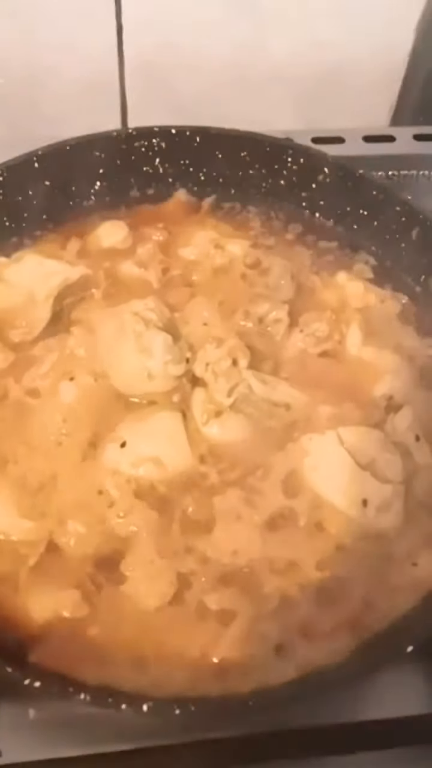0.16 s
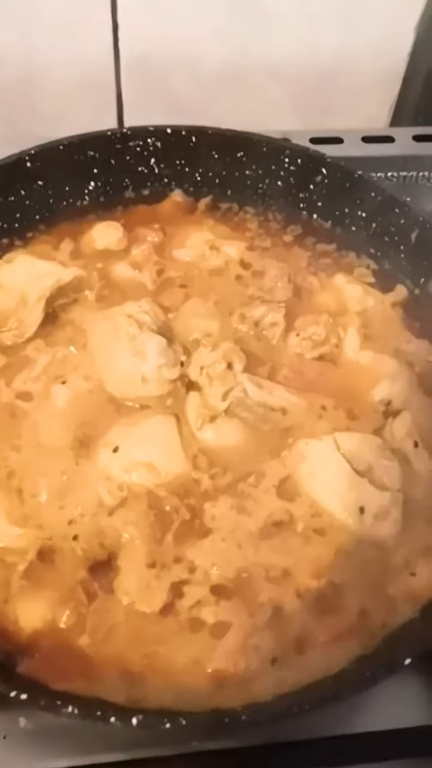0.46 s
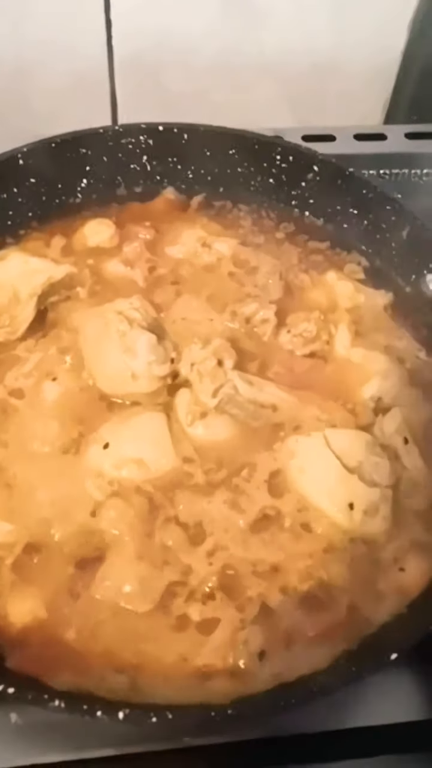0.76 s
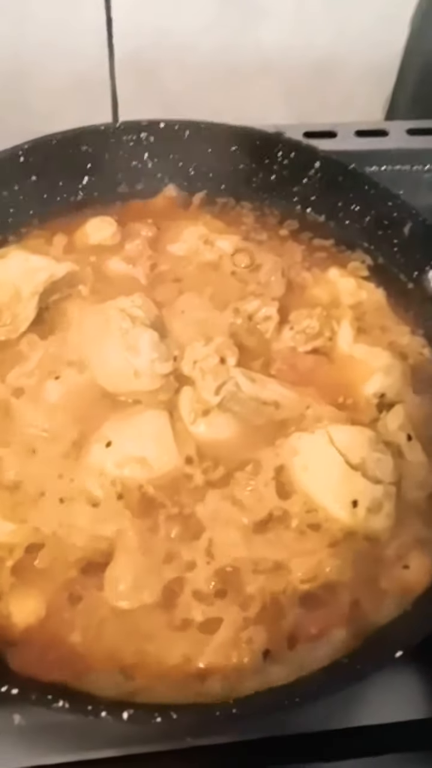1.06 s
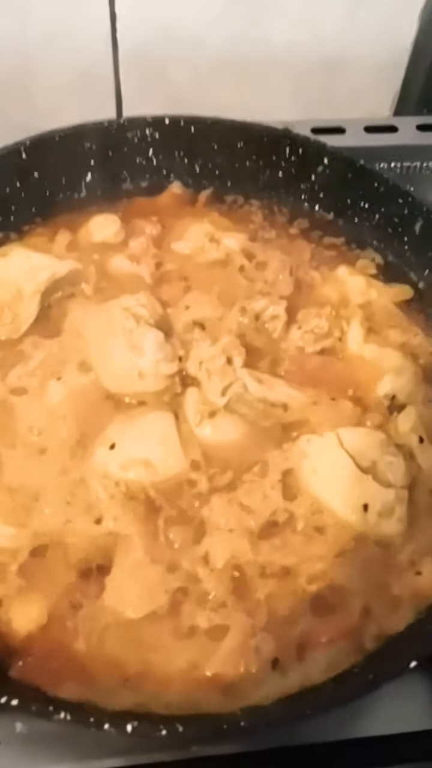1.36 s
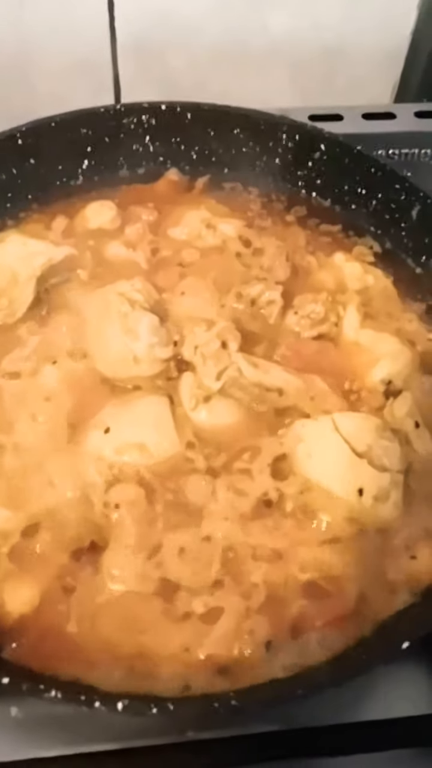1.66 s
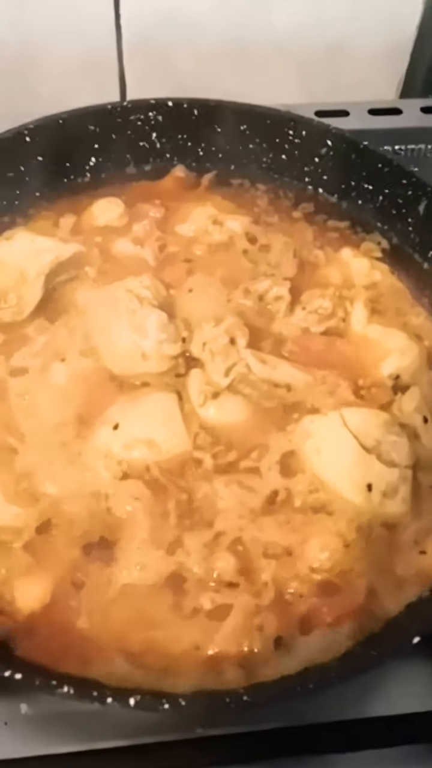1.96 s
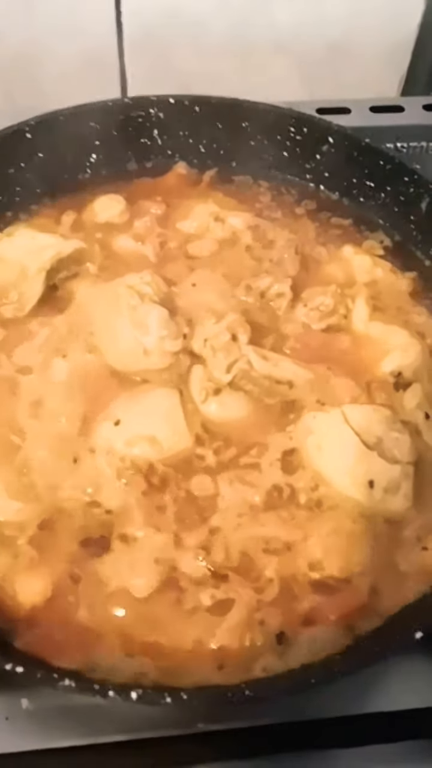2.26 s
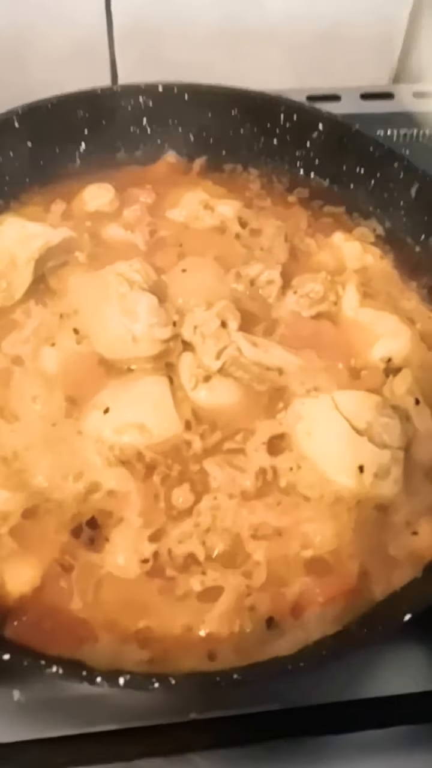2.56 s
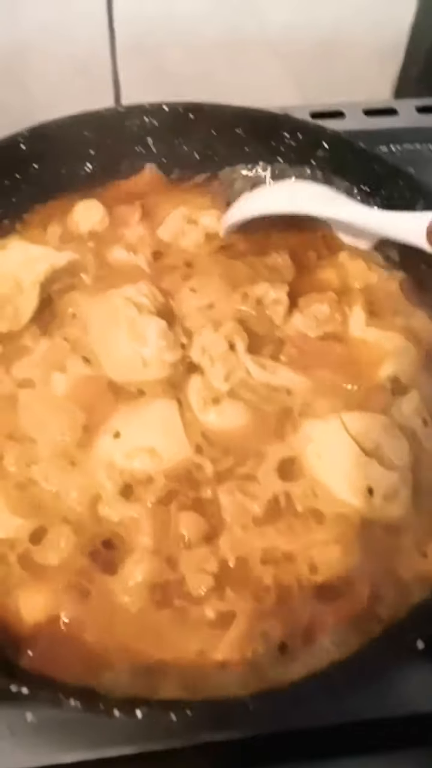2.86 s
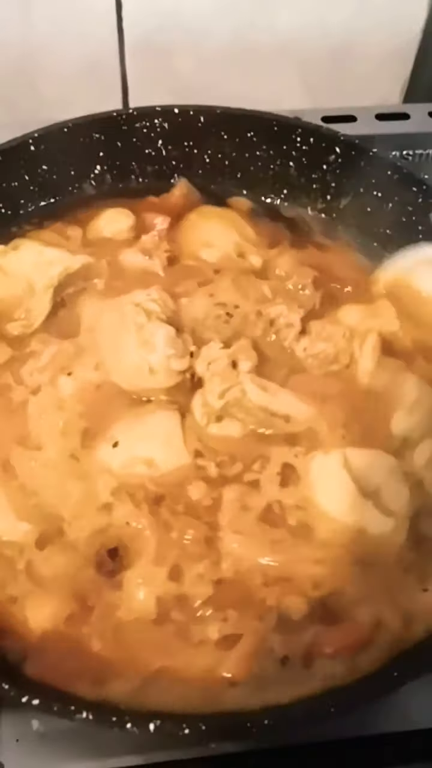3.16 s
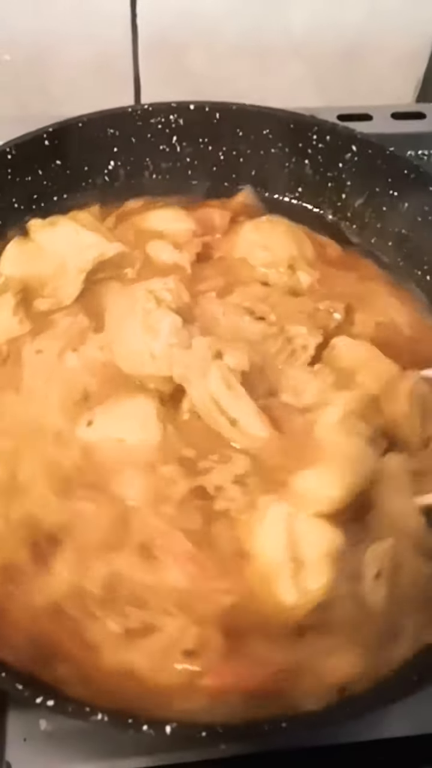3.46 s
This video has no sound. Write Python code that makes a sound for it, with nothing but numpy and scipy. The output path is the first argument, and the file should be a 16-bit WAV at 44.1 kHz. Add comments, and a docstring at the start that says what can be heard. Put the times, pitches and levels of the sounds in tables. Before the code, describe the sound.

Pan lid clattering and sliding loudly beside the stove, then quiet bubbling with light spoon knocks.

```python
"""A thick curry simmers throughout in a tiled kitchen: coloured-noise fizz and floor, with crackle and bubble
grains. From the start a pan lid slides to the right of the stove: random slips drive rumble, rasp, ring and a
cabinet boom. It clanks, bumps and rattles to rest: noise bursts with decaying modes of lid, rack and worktop.
Then a few low plops (short tone pulses) and a spoon: it is picked up, then swishing noise and light knocks on
the pan (noise bursts)."""
import sys
import numpy as np
from scipy import signal
from scipy.fft import rfft, irfft, next_fast_len
from scipy.io import wavfile
from scipy.ndimage import uniform_filter1d, map_coordinates

SR = 44100
rng = np.random.default_rng(int(sys.argv[2]) if len(sys.argv) > 2 else 0)


def dump(signal):
    """Clip the signal to [-1, 1] and save it as 16-bit WAV at the path in sys.argv[1]."""
    limited = np.clip(np.atleast_2d(signal).T, -1, 1)
    pcm = np.round(limited * 32767).astype(np.int16)
    wavfile.write(sys.argv[1], SR, pcm)


N = 158760
T = np.arange(SR * 3 // 4) / SR  # time axis of one hit, s
BLOW_S = 0.02

# Simmer: noise colour of the fizz: hz, gain_db
FIZZ = [(300, -21.5), (2000, 3.5), (3500, 1.5), (5500, -3.5), (7500, -6), (9200, -4), (11000, -17.5),
        (13000, -16), (16000, -18.5)]
# Jets of steam through the sauce: centre_s, level_db (before layer trims), e_fold_s
SPURTS = [(1.702, -72.5, 0.016), (1.876, -65, 0.014), (2.035, -71, 0.0348), (2.24, -70.5, 0.036),
          (2.66, -67, 0.015), (3.069, -65.5, 0.033)]
# Low simmer and stove, noise colour: hz, gain_db
FLOOR = [(15, -53.5), (25, -5), (118, -2), (175, -5.5), (299, -11.5), (425, -20.5), (567, -12.5),
         (1150, -20.5), (1470, -24), (2000, -24.5), (3500, -39), (6000, -110)]
SIZZLE_DB, FIZZ_DB, CRACKLE_DB = -74.5, 6, 5.5  # sizzle: base level; fizz, crackle: trims on it
BUBBLE_DB, FLOOR_DB = -70.5, -61.5

# Sliding lid, levels before the slide trim: time_s, rumble_db, rasp_db, treble_db
SLIDE = [(0, -36.5, -25, -35), (0.121, -44.5, -42.5, -52), (0.281, -38, -37.5, -48),
         (.45, -34.5, -40.5, -52), (0.519, -23.5, -30.5, -45.5), (.61, -28.5, -43.5, -46.5),
         (.72, -35.5, -41, -52), (0.813, -34, -30.5, -47.5), (0.872, -25, -28.5, -50), (.95, -27, -39, -34),
         (1.032, -22, -23, -29), (1.09, -32, -31, -34.5), (1.188, -36.5, -38.5, -41.5),
         (1.251, -46.5, -42, -52), (1.36, -67, -66, -65), (1.49, -52.5, -60, -55), (1.561, -70, -69.5, -92)]
# Rim squeaks and chirps: start_s, pitch_hz, rms_db (before the room), length_s
SQUEAKS = [(0.358, 6690, -41, 0.008), (0.483, 3486, -36, .012), (0.485, 6490, -48.5, .015),
           (0.544, 6660, -51, .01), (0.637, 6730, -38, .012), (0.922, 3464, -20, 0.01),
           (1.003, 6580, -33, .04), (1.056, 6350, -28, .014)]
SQUEAK_WOBBLE_PER_S = 740  # knots of random phase
SLIPS_PER_S, SLIP_SPREAD_DB, CATCHES_PER_S, CATCH_DB = 260, 4, 130, 3.5
# Cabinet under the sliding lid, noise colour: hz, gain_db
BOOM = [(24, -28.5), (38, -8), (55, -7), (80, 5), (110, -9), (200, -23), (600, -74)]
BOOM_DB, BOOM_FOLLOW = -44.5, 0.25  # level at average rumble; share of the rumble's dB swing

# Lid contacts, levels before trims: start_s, thud_db, clack_db, tick_db, lid_ring_db, rack_ring_db, contact_t60_s
CONTACTS = [(0.003, -45, -29.5, -50.5, -29, -52, 0.0075), (0.1447, -31.5, -18.5, -25.5, -8.5, -33, 0.044),
            (0.305, -30, -38.5, -61, -34, -50, 0.092), (0.361, -42.5, -36, -46, -56, -61.5, 0.0054),
            (0.403, -28.5, -49, -62, -58, -63, 0.014), (0.428, -49, -34, -45, -39, -43.5, 0.036),
            (0.567, -17, -30, -50, -43, -19, 0.021), (0.587, -27.5, -24, -43, -34, -27.5, 0.061),
            (0.6396, -23, -17.5, -28.5, -27, -8.5, 0.039), (0.691, -27, -29.5, -58.5, -44, -31.5, 0.0054),
            (0.7604, -32, -24, -30, -39, -39, 0.0044), (0.7915, -40, -25.5, -48, -51, -42, 0.0034),
            (0.8555, -23, -40.5, -58, -45.5, -37, 0.02), (0.9229, -25, -17, -22, -36, -25, 0.02),
            (0.9671, -20.5, -19, -33.5, -31, -17.5, 0.0095), (0.9943, -18, -17, -27, -28, -14, 0.011),
            (1.004, -37, -19.5, -29, -39, -24.5, 0.016), (1.0194, -29, -13, -24, -27.5, -21.5, 0.053),
            (1.041, -30, -18, -29, -29.5, -26.5, 0.011), (1.087, -30, -21.5, -34, -54, -34, 0.0045),
            (1.109, -25.5, -13.5, -29.5, -36, -29, 0.0035), (1.128, -27.5, -32.5, -24, -38, -22, 0.033),
            (1.1744, -25.5, -20, -63, -50, -42.5, 0.0072), (1.398, -30.5, -48, -45.5, -63, -62.5, 0.064),
            (1.413, -34.5, -33, -63, -63, -54, 0.0074), (1.448, -57.5, -35, -51, -62, -52, 0.0031)]
# Lid modes: pitch_hz, level_db (before scatter), t60_s (before the grip)
LID = [(1227, -5, 0.22), (1610, -12, .25), (1917, 1.5, 0.44), (2100, 2, 0.19), (2116, -17.5, .15),
       (2337, 4.5, 0.3), (2372, -6.5, 0.16), (2413, -2, 0.3), (2600, -9, 0.11), (2792, -13, 0.25),
       (2905, -6.5, 0.17), (3560, -16.5, .45)]
# Modes of the metal it lands on: pitch_hz, level_db (before scatter), t60_s
RACK = [(1196, -14, 0.08), (1697, -5.5, 0.35), (1810, -7, .12), (1921, 4, 0.26), (1927, -4, 0.2),
        (2214, -8.5, .15), (2500, -4.5, 0.25), (2735, -2, 0.22), (3280, -17.5, 0.21)]
# Worktop modes: pitch_hz, level_db (before scatter), t60_s
WORKTOP = [(135, -11, 0.31), (171.7, 4.5, 0.2), (223.7, -6, 0.077), (257.9, 2.5, 0.54), (284, -0.5, 0.13),
           (451.4, 1.5, 0.15), (531, -9, 0.35), (572, -3, 0.27)]
# Low part of a contact, noise colour: hz, gain_db
THUD = [(25, -43.5), (60, -31), (110, -24), (165, -8), (260, -1), (480, -2), (700, -6), (1200, -13.5),
        (3000, -97.5)]
# Middle part of a contact, noise colour: hz, gain_db
CLACK = [(60, -39.5), (400, -10), (700, 5), (1250, -2.5), (1750, 5), (2700, 6), (3400, -13.5),
         (5000, -27.5), (9000, -35.5), (16000, -71)]
# Bright part of a contact, noise colour: hz, gain_db
TICK = [(200, -48), (2200, -18), (3400, 10.5), (5000, 2), (6800, -1.5), (9000, -9.5), (11000, -19.5),
        (13000, -43.5), (16000, -54)]
THUD_DB, CLACK_DB, TICK_DB, LID_DB, RACK_DB = -4, -2, -6.5, 1.5, -2  # trims
WORKTOP_DB, THUMP_DB = -7, -6  # relative to the untrimmed thud
THUMP_HZ, THUMP_T60_S, THUMP_WET_DB = 278, 0.03, -6.5
GRIP_S, GRIP_T60_S = 0.13, 0.086  # the hand stops the lid's ring after this long, this fast
CHATTER, CHATTER_PER_S, CHATTER_T60_S = 0.8, 700, 0.16
SNAP_S, SNAP_DB, SNAP_T60_S, SNAP_WET_DB = 0.7612, -28.5, 0.0038, -14  # one very crisp click of the rim
LID_WET_DB, METAL_WET_DB = 5, -3
CLICK_DRY_DB, CLICK_T60_S = 9, 0.005  # less room on brief clicks; e-fold in contact t60

# Bursting bubbles: centre_s, pitch_hz, peak_db (before room and pan), e_fold_s
PLOPS = [(1.872, 181, -27.5, 0.0018), (2.517, 200, -22, 0.0017), (2.687, 847, -48, 0.0031),
         (2.861, 755, -31, 0.0027), (3.011, 239, -34, 0.00216), (3.022, 775, -32, 0.0024)]
# The pan of sauce, gain on each plop: hz, gain_db
PLOP_BODY = [(35, -16), (90, 4), (140, 3), (500, -5)]
PLOP_WET_DB = -16.5

# Spoon drawn along, then through the sauce: time_s, level_db (before wobble)
SWISH = [(2.02, -79), (2.07, -66), (2.27, -62), (2.44, -69.5), (2.52, -91.5), (2.85, -72), (3.0, -66),
         (3.15, -73), (3.3, -69), (3.42, -68), (3.52, -59.5), (3.6, -84.5)]
# Swish noise colour: hz, gain_db
SWISH_COLOUR = [(200, -28), (800, -11), (1600, -0.5), (2700, 0.5), (3500, -20), (8000, -37)]
# Spoon knocks, the first two as it is picked up, the rest on the pan: start_s, thud_db, clack_db, tick_db,
# contact_t60_s
SPOON = [(2.003, -43, -58, -69.5, 0.21), (2.166, -56, -53, -85, 0.0038), (3.262, -67, -71, -59, 0.0055),
         (3.4735, -52, -54.5, -50.5, 0.0015), (3.48, -61, -63, -57, 0.0067),
         (3.5059, -61, -68, -46.5, 0.0025)]
# Thud, clack and tick noise colours of the spoon, each: hz, gain_db
SPOON_COLOURS = ([(40, -16), (150, -1.5), (280, 3), (560, -7), (1000, -14.5), (2500, -83)], [(200, -29),
                 (800, -23), (1400, 9), (2400, 0.5), (3300, -18), (4200, -41.5)], [(300, -19), (1900, -5),
                 (2900, 6.5), (4600, -41), (16000, -52.5)])
SPOON_WET_DB = -2

# Decay of the kitchen's tail: hz, t60_s
ROOM = [(60, 1), (170, 0.6), (300, 0.23), (700, 0.39), (2000, 0.36), (5000, 0.46), (12000, 0.22)]
# Left-right likeness of diffuse sound: hz, correlation
ALIKE = [(60, 0.98), (130, 0.96), (290, 0.79), (640, -0.27), (1400, 0.4), (3000, 0.025)]
EARLY_DB, EARLY_T60_S = 5, 0.049
LID_LAG_S, PAN_LAG_S, PLOP_LAG_S = 0.00061, -0.00008, 0.00057  # left behind right
# Left microphone response: hz, gain_db
LEFT_MIC = [(100, 2), (400, 2.5), (1200, -1.5), (2400, -4.5), (4500, 1.5), (8000, -2), (15000, 3)]
# Right microphone response: hz, gain_db
RIGHT_MIC = [(100, 2.5), (400, 3.5), (1200, 0.5), (2400, -5), (4500, -2), (6800, -12), (8400, -22.5),
             (10500, -17), (15000, 0.5)]
TOP_HZ = 15750


def amp(db):
    """Decibels to gain."""
    return 10 ** (np.asarray(db) / 20)


def unit(x):
    """Scale to rms 1."""
    return x / np.sqrt(np.mean(x ** 2) + 1e-20)


def along(points, hz):
    """Interpolate (hz, value) points on a log axis."""
    point_hz, values = np.transpose(points)
    return np.interp(np.log(hz + 1), np.log(np.maximum.accumulate(point_hz) + 1), values)


def curves(rows):
    """One value per sample for each column after the time."""
    time_s, *columns = np.transpose(rows)
    return [np.interp(np.arange(N) / SR, time_s, column) for column in columns]


def wobble(knots_per_s):
    """Smooth random curve."""
    return map_coordinates(rng.standard_normal(400), [np.arange(N) * knots_per_s / SR], mode="wrap")


def add(out, start_s, x):
    """Mix x into out from start_s."""
    i = max(round(start_s * SR), 0)
    out[..., i:i + x.shape[-1]] += x[..., :N - i]


def coloured(x, spectrum, size=4096):
    """Minimum-phase filter with a (hz, gain_db) response, made by folding its cepstrum."""
    cepstrum = irfft(np.log(amp(along(spectrum, np.fft.rfftfreq(size, 1 / SR)))))
    cepstrum[1:size // 2] *= 2
    cepstrum[size // 2 + 1:] = 0
    ir = irfft(np.exp(rfft(cepstrum)))
    return signal.fftconvolve(x, ir if x.ndim == 1 else ir[None], axes=-1)[..., :x.shape[-1]]


def diffuse(size):
    """Stereo noise, alike in the bass and nearly unrelated in the treble, by mid-side balance."""
    m = next_fast_len(size)
    likeness = along(ALIKE, np.fft.rfftfreq(m, 1 / SR))
    turn = np.arccos(np.clip(likeness, -1, 1)) / 2
    noise = rfft(rng.standard_normal((2, m)))
    mid, side = irfft(noise * [np.cos(turn), np.sin(turn)], m)[:, :size]
    return np.array([mid + side, mid - side])


def kitchen(x, lag_s, wet_db):
    """Direct sound at two microphones, dense early echoes from the tiles and a tail."""
    hz, t, z = signal.stft(diffuse(len(T)), SR, nperseg=256)
    late = amp(-60 * t / along(ROOM, hz)[:, None])
    early = amp(EARLY_DB - 60 * t / EARLY_T60_S)
    tail = signal.istft(z * (late + early) * (t > 0), SR, nperseg=256)[1]
    out = amp(wet_db) * signal.fftconvolve(x[None], tail / np.linalg.norm(tail[0]), axes=1)
    for ear, delay_s in zip(out, (lag_s, -lag_s)):
        ear[max(round(delay_s * SR), 0):][:len(x)] += x
    return out / np.sqrt(1 + amp(wet_db) ** 2 / 2)


def blow(x):
    """Scale a hit so the energy of its first 2 * BLOW_S equals rms 1 over BLOW_S."""
    return x / np.sqrt(np.sum(x[:round(2 * BLOW_S * SR)] ** 2) / (BLOW_S * SR))


def knock(levels_db, colours, t60_s):
    """Sharp strike and brief noisy chatter, split into thud, clack and bright tick."""
    force = rng.standard_normal(len(T)) * amp(-60 * T / t60_s)
    force[0] = np.linalg.norm(force) * np.exp(-t60_s / BLOW_S)  # briefer contact, sharper strike
    return sum(amp(db) * blow(coloured(force, part)) for db, part in zip(levels_db, colours))


def ring(modes, scatter_db=2.0, damp_db=5, damp_t60_s=0.023, attack_s=0.00033, chatter=0):
    """Modes that lose their first strength quickly against the support; chatter roughens their start."""
    tones = 0
    for (hz, db, t60_s), (level, phase) in zip(modes, rng.standard_normal((len(modes), 2))):
        decay = amp(db + scatter_db * level - 60 * T / t60_s)
        tones = tones + decay * np.sin(2 * np.pi * hz * T + np.pi * phase)
    jolts = map_coordinates(rng.standard_normal(CHATTER_PER_S), [T * CHATTER_PER_S])
    rough = 1 + chatter * jolts * amp(-60 * T / CHATTER_T60_S)
    first_strength = 1 + amp(damp_db - 60 * T / damp_t60_s)
    return blow(rough * tones * first_strength * (1 - np.exp(-T / attack_s)))


def grains(count, hz, spread, cycles, size_db, rise, size):
    """Randomly timed little damped bubbles of rising pitch, rms 1."""
    chance = rng.random((count, 2))
    pitch_hz = np.minimum(hz * np.exp(spread * rng.standard_normal((count, 1))), SR / 4)
    k = np.arange(size)
    turns = pitch_hz * k / SR
    age = turns / cycles
    level = amp(-size_db * np.log(0.0066 + chance[:, 1:]))
    envelope = np.exp(-age) * (1 - np.exp(-2 * turns))
    waves = level * envelope * np.sin(2 * np.pi * turns * (1 + rise * np.tanh(age / 2)))
    places = (chance[:, :1] * N).astype(int) + k
    return unit(np.bincount(places.ravel(), waves.ravel(), N)[:N])


def simmer(churn_db=2, wet_db=-5):
    """Fizz and crackle of bursting film swell with each jet of steam, over small bubbles and low churning."""
    t = np.arange(N) / SR
    jets = sum((amp(db) * np.exp(-((t - s) / e_fold_s) ** 2)) ** 2 for s, db, e_fold_s in SPURTS)
    level = np.sqrt(amp(SIZZLE_DB) ** 2 + jets)
    crackle = grains(count=2200, hz=6700, spread=0.19, cycles=2.5, size_db=8.0, rise=0.11, size=200)
    bubbles = grains(count=420, hz=1110, spread=0.35, cycles=1.8, size_db=-5.5, rise=0.076, size=1200)
    grainy = level * amp(CRACKLE_DB) * crackle + amp(BUBBLE_DB) * bubbles
    near = kitchen(grainy, PAN_LAG_S, wet_db)[:, :N]
    flutter = amp(1.3 * wobble(60))
    fizz = level * amp(FIZZ_DB) * flutter * unit(coloured(diffuse(N), FIZZ))
    churning = amp(FLOOR_DB + churn_db * wobble(69)) * unit(coloured(diffuse(N), FLOOR))
    return near + fizz + churning


def lid_slide(metal_db=-4, slide_db=-2, wet_db=-1):
    """Tiny slips, bunched as the rim catches and lets go, excite lid and rack; now and then it squeaks."""
    slips = (rng.random(N) < SLIPS_PER_S / SR) * rng.choice([-1, 1], N)
    slips = slips * amp(SLIP_SPREAD_DB * rng.standard_normal(N))
    slips = slips * amp(CATCH_DB * wobble(CATCHES_PER_S))
    parts = zip(curves(SLIDE), (THUD, CLACK, TICK))
    rumble, rasp, treble = (amp(db) * unit(coloured(slips, part)) for db, part in parts)
    metal = signal.fftconvolve(rasp, ring(LID) / 2 + ring(RACK))[:N]
    out = amp(slide_db) * (rumble + rasp + treble + amp(metal_db) * rasp.std() * unit(metal))
    for start_s, hz, db, length_s in SQUEAKS:
        t = T[T < length_s]
        phase = 2 * np.pi * hz * t + wobble(SQUEAK_WOBBLE_PER_S)[:len(t)]
        add(out, start_s, amp(db) * 2 * np.sin(np.pi * t / length_s) * np.sin(phase))
    return kitchen(out, LID_LAG_S, wet_db)[:, :N]


def cabinet():
    """Deep noise boom that swells with the sliding and ends with it."""
    rumble_db = curves(SLIDE)[0]
    sliding = np.arange(N) < SLIDE[-1][0] * SR
    level_db = BOOM_DB + BOOM_FOLLOW * (rumble_db - rumble_db[sliding].mean())
    swell = amp(level_db) * uniform_filter1d(sliding * 1.0, SR // 20)
    return swell * unit(coloured(rng.standard_normal(N), BOOM))


def lid_contacts():
    """Contacts thump the worktop and ring the rack and hand-held lid; the briefest clicks sound drier."""
    out = np.zeros((2, N))
    grip = amp(-60 * np.maximum(T - GRIP_S, 0) / GRIP_T60_S)
    for start_s, thud, clack, tick, lid, rack, t60_s in CONTACTS:
        hit = knock((thud + THUD_DB, clack + CLACK_DB, tick + TICK_DB), (THUD, CLACK, TICK), t60_s)
        lid_ring = grip * ring(LID, damp_db=9, damp_t60_s=0.095, chatter=CHATTER)
        rack_ring = ring(RACK, damp_db=7, damp_t60_s=0.098, chatter=CHATTER)
        metal = amp(lid + LID_DB) * lid_ring + amp(rack + RACK_DB) * rack_ring
        wood_ring = ring(WORKTOP, damp_db=8.5, damp_t60_s=0.23, attack_s=0.0032)
        wood = amp(thud + WORKTOP_DB) * wood_ring
        # the worktop gives under the contact
        thump = blow(np.sin(2 * np.pi * THUMP_HZ * T) * amp(-60 * T / THUMP_T60_S))
        wet_db = LID_WET_DB - CLICK_DRY_DB * np.exp(-t60_s / CLICK_T60_S)
        add(out, start_s, kitchen(hit + wood, LID_LAG_S, wet_db))
        add(out, start_s, kitchen(metal, LID_LAG_S, METAL_WET_DB))
        add(out, start_s, kitchen(amp(thud + THUMP_DB) * thump, LID_LAG_S, THUMP_WET_DB))
    snap = amp(SNAP_DB - 60 * T / SNAP_T60_S) * rng.standard_normal(len(T))
    add(out, SNAP_S, kitchen(snap, LID_LAG_S, SNAP_WET_DB))
    return out


def plops():
    """Large bubbles open in the thick sauce with only brief ring; the pan of sauce colours them low."""
    out = np.zeros((2, N))
    t = T - BLOW_S  # pulse centre at BLOW_S, so each starts that much early
    for centre_s, hz, db, e_fold_s in PLOPS:
        pulse = amp(db) * np.exp(-(t / e_fold_s) ** 2) * np.cos(2 * np.pi * hz * t)
        add(out, centre_s - BLOW_S, kitchen(pulse, PLOP_LAG_S, PLOP_WET_DB))
    return coloured(out, PLOP_BODY)


def spoon():
    """Coloured noise swishes softly as the spoon is drawn; short noise bursts knock lightly as it is picked up
    and then on the pan."""
    level_db, = curves(SWISH)
    out = amp(level_db + wobble(70)) * unit(coloured(diffuse(N), SWISH_COLOUR))
    for start_s, thud, clack, tick, t60_s in SPOON:
        hit = knock((thud, clack, tick), SPOON_COLOURS, t60_s)
        add(out, start_s, kitchen(hit, PAN_LAG_S, SPOON_WET_DB))
    return out


def scene():
    """Sum of all sources: lid and plops to the right, spoon knocks and crackle near the centre."""
    return simmer() + lid_slide() + cabinet() + lid_contacts() + plops() + spoon()


def record(dry):
    """Two microphones, the right duller than the left; nothing passes TOP_HZ."""
    pair = np.array([coloured(dry[0], LEFT_MIC), coloured(dry[1], RIGHT_MIC)])
    m = next_fast_len(N + SR // 2)
    passband = np.fft.rfftfreq(m, 1 / SR) < TOP_HZ
    return irfft(rfft(pair, m) * passband, m)[:, :N]


dry = scene()
out = record(dry)
dump(out)
```